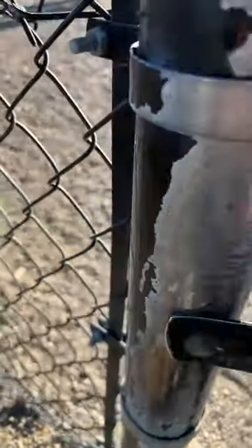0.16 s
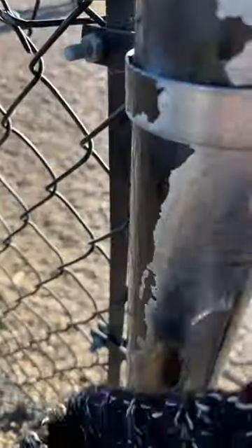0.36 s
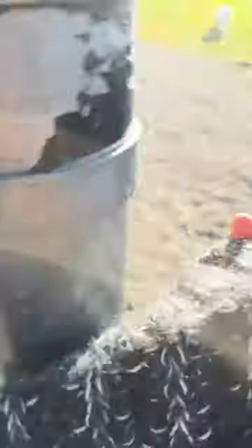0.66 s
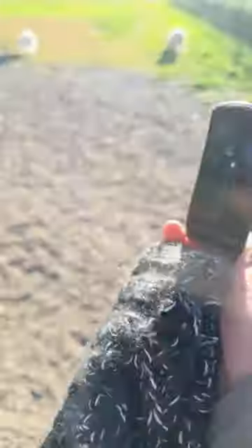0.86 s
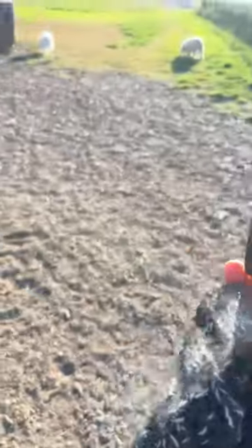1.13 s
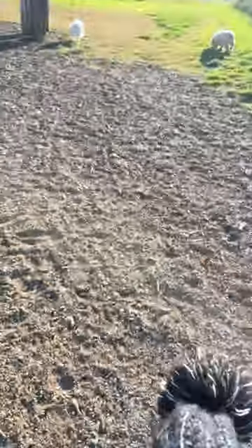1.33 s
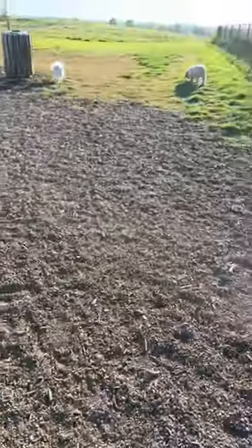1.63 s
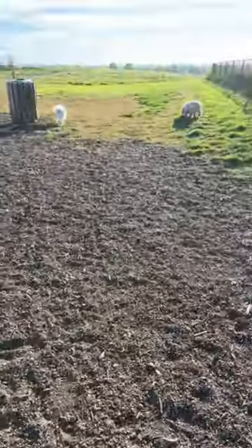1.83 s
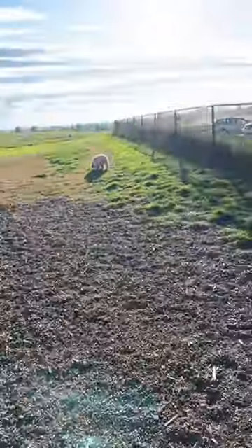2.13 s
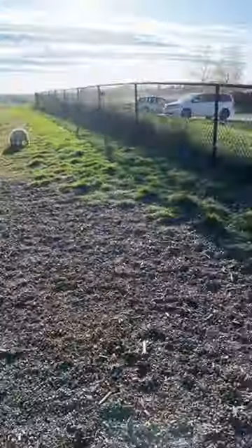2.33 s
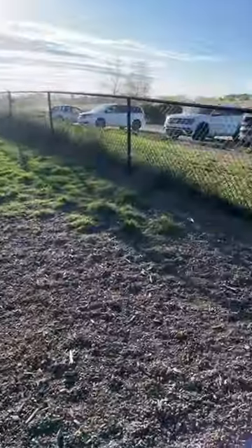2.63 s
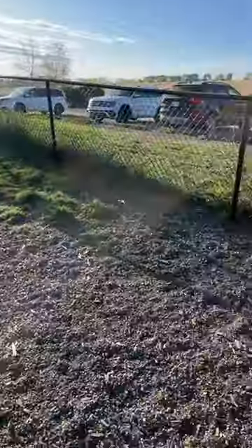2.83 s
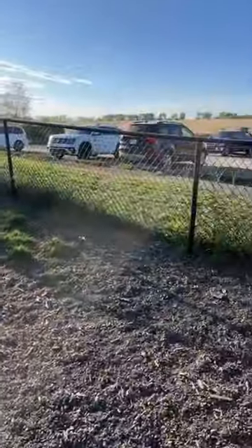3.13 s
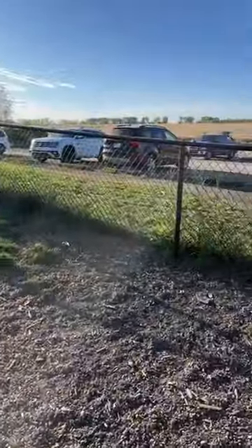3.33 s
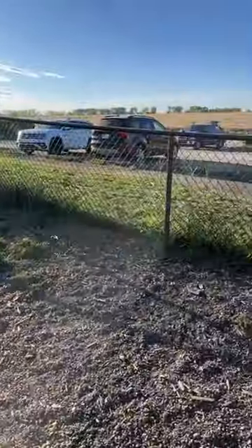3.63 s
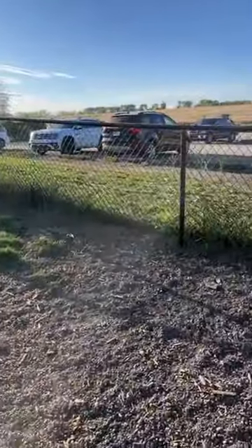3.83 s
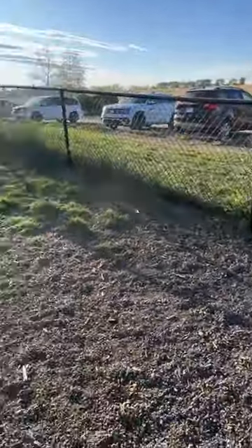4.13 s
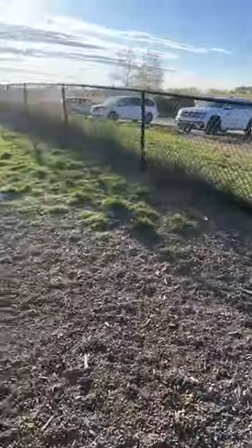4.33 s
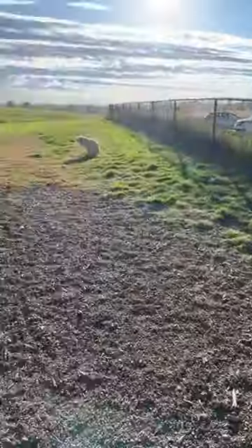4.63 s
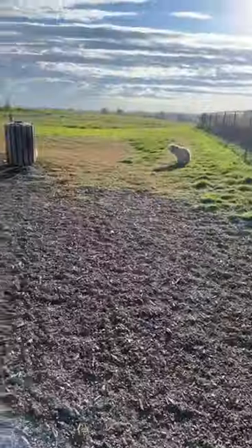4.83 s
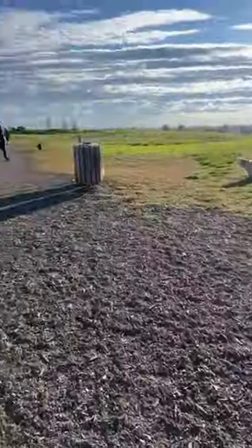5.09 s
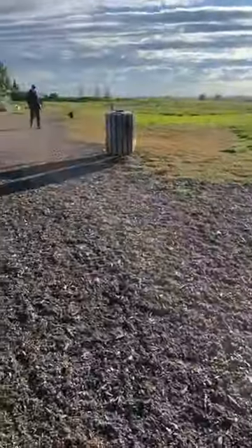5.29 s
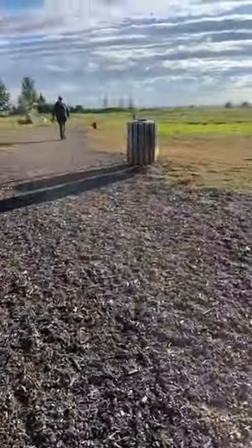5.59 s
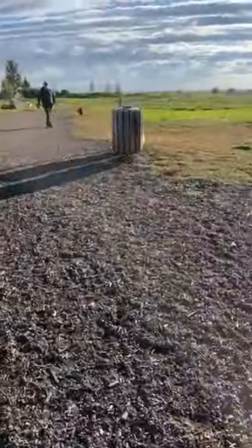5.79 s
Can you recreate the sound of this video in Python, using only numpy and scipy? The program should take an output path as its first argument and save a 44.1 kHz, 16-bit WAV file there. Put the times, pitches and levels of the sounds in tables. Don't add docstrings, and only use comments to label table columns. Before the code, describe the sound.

Close outdoor sound of a chain-link gate: fork latch clanks on its post, a bar scrapes and knocks, a brief dropout, then a ring chimes. Bright bar clacks follow, the hinge squeals, and the frame slams and rattles around four seconds, with a last latch clank. Afterwards only low far traffic, faint hiss, quick bird ticks and light mulch crunches remain.

```python
import sys
import numpy as np
from scipy import signal
from scipy.fft import rfft, irfft, next_fast_len
from scipy.io import wavfile
from scipy.ndimage import uniform_filter1d, map_coordinates

SR = 44100
rng = np.random.default_rng(int(sys.argv[2]) if len(sys.argv) > 2 else 0)


def invert_db(level):
    return 10 ** (np.asarray(level, dtype=float) / 20)


def put_to_file(sound):
    columns = np.atleast_2d(sound).T
    safe = np.clip(columns, -1, 1)
    whole_steps = np.round(safe * 32767)
    wavfile.write(sys.argv[1], SR, whole_steps.astype(np.int16))


N = 262452


def unit(x):
    return x / np.sqrt(np.mean(x ** 2) + 1e-20)


def along(points, hz):
    f, v = np.transpose(points)
    return np.interp(np.log(hz + 1), np.log(f + 1), v)


def curves(rows, t):
    s, *columns = np.transpose(rows)
    return [np.interp(t, s, column) for column in columns]


def span(rows):
    first = round(rows[0][0] * SR)
    last = min(N, round(rows[-1][0] * SR))
    return np.arange(first, last) / SR


def wobble(rate, size=N):
    knots = rng.standard_normal(size + 8)
    return map_coordinates(knots, [np.arange(size) * rate / SR])


def filtered(x, response):
    m = next_fast_len(len(x) + 8192)
    return irfft(rfft(x, m) * response(np.fft.rfftfreq(m, 1 / SR)), m)[:len(x)]


def patchy(x, patchy_db):
    z = signal.stft(x, nperseg=512)[2]
    field = uniform_filter1d(rng.standard_normal(z.shape), size=8, axis=0)
    field = uniform_filter1d(field, size=12, axis=1)
    return signal.istft(z * invert_db(patchy_db * unit(field)), nperseg=512)[1][:N]


def noise(spectrum, patchy_db):
    white = patchy(rng.standard_normal(N), patchy_db)
    return unit(filtered(white, lambda hz: invert_db(along(spectrum, hz))))


def add(track, s, x):
    part = track[round(s * SR):][:len(x)]
    part += x[:len(part)]


def tone(hz, db, t60, rise):
    t = np.arange(SR * 2 // 3) / SR
    return invert_db(db - 60 * t / t60) * (1 - np.exp(-t / rise)) * np.sin(2 * np.pi * hz * t)


def swell(s, db, build, lose):
    late = np.arange(N) / SR - s
    shape = np.abs(late / np.where(late < 0, build, lose)) ** 1.4
    return invert_db(db - 20 * shape)


def ringing(x, modes):
    def bank(f):
        total = 0
        for k, (centre, width, db) in enumerate(modes):
            damping = 1j * f * width
            total = total + (-1) ** k * invert_db(db) * damping / (centre * centre - f * f + damping)
        return total

    power = sum(invert_db(2 * db) * np.pi * width / SR for centre, width, db in modes)
    return filtered(x, bank) / np.sqrt(power)


SPLIT_HZ = 6000


def struck(hits, modes, rise, mesh):
    lead_s, lead_rises, lead_db = .009, 3, -22
    t = np.arange(SR // 5) / SR - lead_s
    after = np.maximum(t, 0)
    graze = np.maximum(1 + t / min(lead_s, lead_rises * rise), 0) * (t < rise)
    touch = np.maximum(1 - np.exp(-after / max(rise, .0003)), invert_db(lead_db) * graze)
    crack = 1 + 2.2 * invert_db(-60 * np.abs(t - rise) / 0.0092)
    rattle, drive = np.zeros((2, 2, N))
    for s, db, high_db, t60, ring_db in hits:
        blow = invert_db(db - 11.0 - 60 * after / max(t60, .004)) * touch
        start = s - .0015 - lead_s
        for band, gain in enumerate([1, invert_db(high_db)]):
            add(rattle[band], start, gain * blow * crack)
            add(drive[band], start, gain * invert_db(ring_db) * blow)
    force = drive * rng.standard_normal((2, N))
    low = [mode for mode in modes if mode[0] < SPLIT_HZ]
    high = [mode for mode in modes if mode[0] >= SPLIT_HZ]
    return np.sum(rattle * mesh, axis=0) + 2 * ringing(force[0], low) + 2 * ringing(force[1], high)


def grit_bursts(rows):
    out, t = np.zeros(N), np.arange(SR // 8) / SR
    for s, db, hz, t60 in rows:
        burst = invert_db(-60 * t / max(t60, .003)) * (1 - np.exp(-t / 0.001057)) * rng.standard_normal(len(t))
        grit = filtered(burst, lambda f: invert_db(-11 * np.log2((f + 1) / hz) ** 2) + .02)
        add(out, s - .001, invert_db(db - 3.0) * grit / np.abs(grit).max())
    return out


# frequency in Hz, density in dB per Hz.
ROAD = [(15, -73), (25, -48.5), (43, -28), (65, -4.5), (113, -0.5), (219, -3), (253, -6.5), (544, -9),
        (840, -6.5), (1500, -15), (2620, -38), (3220, -43.5), (3500, -61.5), (4550, -72), (7700, -120)]
# time in seconds, level in dB.
TRAFFIC = [(0.0, -46.5), (0.5, -41), (0.68, -45.5), (5.95, -45.5)]


def traffic():
    level_db = curves(TRAFFIC, np.arange(N) / SR)[0] - 1.17 + 0.49 * wobble(7.5)
    return invert_db(level_db) * noise(ROAD, patchy_db=1.35)


# frequency in Hz, density in dB per Hz.
HISS = [(1290, -17.5), (2200, -2), (2930, -10.5), (3060, -7), (3330, -4.5), (6210, -6.5), (13400, -11),
        (15200, -16.5), (16500, -38)]
# time in seconds, level in dB.
GRASS = [(0, -68.5), (1.15, -68), (1.7, -72.5), (4.4, -73), (4.6, -80.5), (5.5, -77.5), (5.95, -73.5)]
# time of the peak in seconds, level in dB, seconds to build 20 dB, seconds to lose 20 dB.
BRUSH = [(1.05, -63.5, .5, 0.15), (1.77, -69, 0.4, 0.7), (2.1, -65, 0.24, 0.1), (3.5, -79, 1.7, -1),
         (4.72, -71, 0.1, -0.24), (4.95, -72.5, 0.2, 0.3), (5.41, -73, 0.44, -0.1), (5.62, -67.5, 0.2, 0.3)]


def rustle():
    power = invert_db(2 * curves(GRASS, np.arange(N) / SR)[0])
    power = power + sum(swell(*row) ** 2 for row in BRUSH)
    return np.sqrt(power) * invert_db(.6 + 1.2 * wobble(16)) * noise(HISS, patchy_db=1.3)


# frequency in Hz, density in dB per Hz.
CLATTER = [(240, -49.5), (400, -16.5), (711, -14), (2020, -13), (3650, -4), (4000, -4.5), (6490, -1.5),
           (7010, -3.5), (10500, 2), (13500, -8), (15900, -8), (16600, -39.5)]


def loose_mesh():
    grit = noise(CLATTER, patchy_db=3) * invert_db(2.5 * wobble(700))
    low = filtered(grit, lambda f: 1 / (1 + (f / SPLIT_HZ) ** 4))
    return np.array([unit(low), unit(grit - low)])


# time in seconds, peak in dB, treble share in dB, T60 in seconds,
# share in the resonances in dB.
FORK_HITS = [(.1043, -31, -5, 0.034, 19), (.1118, -34.5, -9.5, 0.052, 15), (.184, -50.5, -15, 0.048, 12),
             (.2815, -28.5, -7, 0.052, 13.5), (.3184, -33, -9, 0.061, 2), (.342, -33.5, -13.5, 0.05566, 6),
             (3.5314, -54, -14.5, 0.02848, 2), (4.2605, -20, 1.5, 0.052, 8.5),
             (4.2985, -26.5, -7, 0.029, 10), (4.3364, -45, -16, 0.084, -1), (4.3794, -46, -18, 0.02396, -5)]
# frequency in Hz, width in Hz, level in dB.
FORK = [(1150, 110, -14), (4030, 70, -10), (4368, 45, 0.5), (4580, 40, -1.5), (4700, 80, -4.5),
        (5027, 170, -4.5), (6550, 73, -9.5), (7400, 72, -3), (8100, 43, -2.5), (8200, 210, -3),
        (9100, 340, -6.5), (11980, 83, -4.5), (12810, 30, -21), (13600, 70, -13), (15000, 360, -15)]


def fork(mesh):
    return struck(FORK_HITS, FORK, .0028, mesh)


# time in seconds, frequency in Hz.
CHIME_HZ = [(.112, 4344), (.445, 716), (.506, 3210), (.53, 3716), (.531, 14590), (1.05, 2600), (1.2, 8775),
            (1.201, 8812), (1.31, 14250), (2.402, 3720), (2.415, 9900), (2.941, 155), (2.997, 125),
            (3.115, 14590), (3.703, 2158), (3.955, 1600), (4.3, 8020), (4.262, 6546), (.392, 3200),
            (3.996, 3182), (4.01, 8247), (4.262, 4339), (2.415, 7440), (.445, 3705), (.104, 4900),
            (.28, 4930), (.104, 7450), (.276, 7450), (1.2, 3510), (.525, 10300)]
# peak in dB, T60 in seconds.
CHIMES = [(-44, 0.24), (-33.5, 0.18), (-43.5, 0.2), (-54.5, 0.264), (-44, .21), (-58, 0.18), (-28.5, 0.23),
          (-33, 0.23), (-54, .18), (-45, 0.1), (-44, .15), (-24, 0.038), (-35, 0.093), (-48, 0.1772),
          (-39.5, 0.18), (-39, .081), (-49, 0.3413), (-24.5, 0.098), (-34, 0.29), (-37.5, 0.39),
          (-30.5, 0.27), (-22.5, 0.12), (-48, .12), (-31, .2), (-33, .07), (-35, .06), (-38, .08),
          (-37, .08), (-40, 0.16), (-45, .12)]


def chimes():
    out = np.zeros(N)
    for (s, hz), (db, t60) in zip(CHIME_HZ, CHIMES):
        add(out, s, tone(hz, db, t60, rise=.0035))
    return out


# time in seconds, peak in dB, treble share in dB, T60 in seconds,
# share in the resonances in dB.
BAR_RUBS = [(.368, -29.5, -11, 0.088, 1), (.4005, -24, -7.5, .12, -6), (.435, -26, -6.5, 0.11, 1),
            (.452, -28.5, -4, 0.092, 2.5), (.461, -23.5, -2.5, 0.067, 2.5), (.473, -26, 0, 0.039, 0),
            (.481, -38, -5, 0.026, -14)]
# time in seconds, peak in dB, treble share in dB, T60 in seconds,
# share in the resonances in dB.
BAR_HITS = [(.4035, -27, -10, .02, -10), (.4384, -25, -8, .02, -10), (.373, -36, 0, 0.018, -10),
            (4.1565, -29, 5, 0.028, -14), (4.167, -42, 3.5, .03, -13), (.5068, -15.5, -9, 0.057, -1.5),
            (.5268, -22.5, 1.5, 0.064, -11.5), (2.3994, -44, 7.5, 0.06274, -5), (2.4147, -46, 7.5, 0.09, 5),
            (2.4948, -43.5, 10.5, 0.03246, -8), (2.5319, -16, 0, 0.04538, 1.9),
            (2.5425, -12, 7.5, 0.05953, -8), (2.5544, -21.5, -5, 0.0609, -10),
            (2.5684, -18.5, -1, 0.075, -7.5), (2.5974, -29.5, -2, 0.065, -4), (2.6078, -40, -7, .05, -10.5),
            (3.1055, -38.5, -5, 0.0719, -8.5), (3.1151, -31.5, -1.5, 0.074, -8),
            (3.176, -41, 2.5, .038, -11), (3.2218, -43.5, 3, 0.05106, -11.5)]
# frequency in Hz, width in Hz, level in dB.
BAR = [(692, 36, -12), (815, 35, -10), (1104, 64, -7.5), (1646, 100, -10.5), (2150, 64, -13),
       (3236, 47, -4), (3740, 40, 3.5), (5425.8, 90, -7), (6310, 40, 0), (7500, 45, -5), (8730, 81, -6.5),
       (9877.2, 68, -6.5), (10610, 50, -3.5), (11910, 60, -11.5), (12640, 65, -11), (13200, 160, -10.5),
       (13600, 50, -5.5), (15187, 110, -10.5)]


def bar(mesh):
    blows = struck(BAR_HITS, BAR, 0.0011, mesh)
    rubs = struck(BAR_RUBS, BAR, .005, mesh)
    return blows + rubs


# frequency in Hz, density in dB per Hz.
RASP = [(1060, -42), (1800, -9), (2120, -6), (2550, -8.5), (3140, -5), (8280, -13), (15500, -23.5),
        (16600, -45)]
# time of most pressure in seconds, level in dB, seconds to build 20 dB,
# seconds to lose 20 dB, share in the resonances in dB.
SCRAPE = [(.47, -36.5, 0.17, 0.0547, 4.5), (1.305, -44, 0.03, .06, -13), (2.402, -55, 0.01, 0.11, 6),
          (2.53, -56, 0.02, 0.16, 3), (2.565, -32.5, -0.0857, 0.0766, -8), (3.14, -54.5, 0, -0.03, 0),
          (3.42, -67, 0.5, -1.5, -1), (3.64, -50.5, 0.18, 0.03, -7), (3.77, -54.5, 0, 0.47, -10),
          (3.985, -42.5, 0.28, 0.07, -3.5), (4.035, -39.5, 0.0247, 0.2371, -5.5), (4.2, -54, 0.26, .1, -15),
          (3.25, -56.5, 0.06, 0.22, -18), (4.33, -45.5, 0.15, 0.13, -15.5)]


def scrape():
    grains = patchy(rng.standard_normal(N), patchy_db=4) * invert_db(3 * wobble(300))
    steel = unit(ringing(grains, BAR + FORK[1:6]))
    mesh = unit(noise(RASP, patchy_db=1.8) * invert_db(2.2 * wobble(70)))
    out = np.zeros(N)
    for s, db, build, lose, tuned_db in SCRAPE:
        out += swell(s, db - 8, build, lose) * (mesh + invert_db(min(tuned_db, 8)) * steel)
    return out


# time in seconds, peak in dB, centre in Hz, T60 in seconds.
TICKS = [(0.8982, -42, 5223, 0.078), (1.094, -39, 3080, 0.1034), (1.144, -47, 3120, .013),
         (1.7851, -50, 5360, 0.063), (1.963, -54, 3430, 0.0368), (1.989, -46, 3350, 0.041),
         (3.4274, -46, 4933, 0.021), (4.884, -52, 4720, .03), (5.496, -52.5, 2600, 0.012),
         (5.5915, -46, 2500, 0.015), (5.6033, -47, 2800, 0.011), (5.6284, -48, 5200, .016),
         (5.6554, -48, 3050, .014), (5.6833, -46, 2700, .014), (5.7372, -52, 2400, .012),
         (5.7616, -47, 3300, .014), (2.18, -48.5, 4000, 0.014), (4.2994, -21.5, 4730, .02),
         (3.2, -54, 5000, .03), (3.26, -53.5, 5500, .03), (3.29, -52, 5500, .03), (3.318, -52, 5500, .03),
         (3.34, -49, 5000, .03), (3.354, -49, 5000, .03), (2.452, -50, 6000, .04), (2.51, -54, 3300, .04),
         (2.12, -48, 9000, .03), (1.175, -35, 2300, .012), (1.7476, -44.5, 5600, .05)]


def ticks():
    return grit_bursts(TICKS)


# time in seconds, peak in dB, treble share in dB, T60 in seconds,
# share in the resonances in dB.
RING_HITS = [
    (1.0515, -52, 1.5, 0.1, -6),
    (1.1971, -27, 3.5, 0.068, 6),
    (1.206, -29, -8, 0.15, -13),
    (1.301, -27, -4.5, 0.12, -15),
    (3.456, -28, -7, 0.051, -21),
    (3.554, -42, -1, 0.049, 1.5),
]
# frequency in Hz, width in Hz, level in dB.
RING = [(1720, 399.3, -8.5), (2470, 200, -9.5), (3120, 45, 3.5), (3550, 33, 1.5), (4020, 81, -3),
        (5036.6, 39.54, -12), (7140, 40, -22), (8900, 30, 4.5), (9430, 60, 6), (10000, 50, -15),
        (12950, 770, -27)]


def ring_blows(mesh):
    return struck(RING_HITS, RING, 0.003426, mesh)


def strokes_of(strokes, tones):
    out = np.zeros(N)
    for s, db in strokes:
        add(out, s, sum(tone(hz, db + level_db, t60, rise=0.0066) for hz, level_db, t60 in tones))
    return out


# frequency in Hz, level in dB, T60 in seconds.
RING_TONES = [(3110, -0.5, 0.72), (3140, -2, 0.69)]
# time in seconds, level in dB.
RING_STROKES = [
    (1.118, -60),
    (1.213, -31.5),
    (1.309, -46),
]


def ring_chime():
    return strokes_of(RING_STROKES, RING_TONES)


# frequency in Hz, level in dB, T60 in seconds.
TAG_TONES = [(11100, 0, .05), (9500, -4, .045)]
# time in seconds, level in dB.
TAG_STROKES = [
    (1.783, -55.5),
    (2.04, -72),
    (2.178, -64),
    (2.282, -52),
    (2.297, -64),
]


def tags():
    return strokes_of(TAG_STROKES, TAG_TONES)


# start in seconds, length in seconds, peak in dB, centre
# in Hz.
STEPS = [
    (1.969, .11, -52.5, 3460),
    (4.6, .18, -68.5, 2400),
    (5.558, .15, -53.5, 3300),
    (5.7, .12, -66, 3000),
]


def steps(count=20):
    scatter_db, scatter_octaves, t60 = 3.5, .4, .016
    rows = []
    for s, length, db, hz in STEPS:
        when = s + length * (np.arange(count) + rng.random(count)) / count
        size, pitch = rng.standard_normal((2, count))
        rows += zip(when, db + scatter_db * size, hz * 2 ** (scatter_octaves * pitch), [t60] * count)
    return grit_bursts(rows)


# time in seconds, frequency in Hz, level in dB.
SLIDE = [(2.398, 1500, -44), (2.41, 1330, -46), (2.425, 1150, -38), (2.445, 1090, -43), (2.465, 1060, -61)]


def slide():
    out, t = np.zeros(N), span(SLIDE)
    hz, db = curves(SLIDE, t)
    add(out, t[0], invert_db(db) * np.sin(2 * np.pi * np.cumsum(hz) / SR))
    return out


# start in seconds, length in seconds, first frequency in Hz, last frequency in Hz, level in dB.
WHINE = [
    (2.55, .85, 1279, 1562, -56.5),
    (4.65, .4, 1600, 1353, -63),
]
BEND = [.7, 1.05]


def whine():
    out = np.zeros(N)
    for (s, length, first_hz, last_hz, db), bend in zip(WHINE, BEND):
        u = np.linspace(0, 1, round(length * SR))
        hz = first_hz + (last_hz - first_hz) * np.sin(np.pi / 2 * u) ** bend
        level_db = db + 3.5 - 12 * u + 2.5 * wobble(19, size=len(u))
        add(out, s, invert_db(level_db) * np.sin(2 * np.pi * np.cumsum(hz) / SR))
    return out


# time in seconds, slip rate in Hz, level in dB.
SQUEALS = [
    [(2.598, 3048, -57), (2.63, 2790, -50), (2.68, 2850, -51.5), (2.705, 2760, -49), (2.735, 2757, -45.5),
     (2.8, 2743, -55), (2.89, 2724, -68.5)],
    [(2.882, 2270, -65), (2.89, 2276, -54), (2.912, 2230, -66), (2.925, 2150, -56), (2.965, 2128, -56),
     (2.98, 2140, -73)],
    [(3.025, 2110, -67), (3.04, 2180, -59.5), (3.065, 2115, -56.5), (3.09, 2190, -61)],
    [(3.09, 2180, -59), (3.3, 2167, -66), (3.365, 2163, -63)],
    [(3.53, 2120, -68), (3.66, 2136, -59.5), (3.715, 2140, -52), (3.732, 2180, -54.5), (3.748, 2303, -53.5),
     (3.81, 2336, -54.5), (3.9, 2360, -55)],
    [(3.9, 2150, -63), (3.93, 2117, -61), (4.16, 2170, -60), (4.19, 2180, -56.5), (4.25, 2180, -63)],
]
OVERTONES = [(3, -3.5, -4.5, -14.5, -12.5, -40), (-16, 0.5, -7.5, -18.5, -28, -31),
             (-10, -1, -7, -16, -28, -35), (-20, -2.5, -14, -10, -30, -35), (-4, 1.5, -6.5, -13, -18, -21),
             (1.8, -5, -19, -10.5, -32, -14)]
# seconds until every second slip weakens, level in dB of the lines halfway,
# steady jitter as a share of the rate, seconds of rough start.
GRIP = [(.01, -38, .0015, 0.11), (.01, -41, .004, 0.002817), (.01, -7, .012, .003), (.01, -25, .03, .003),
        (.218, -3, 0.0065, 0.164), (.01, -15, .02, .003)]


def hinge():
    dulling = .12
    out = np.zeros(N)
    for rows, overtones, (split, half_db, steady, catch) in zip(SQUEALS, OVERTONES, GRIP):
        t = span(rows)
        since = t - t[0]
        hz, db = curves(rows, t)
        db = db - 30 * np.exp((t - t[-1]) / .004)
        half = invert_db(half_db) * np.minimum(since / split, 1) ** 60
        jitter = steady + .014 * np.exp(-(since / catch) ** 4)
        turn = 2 * np.pi * np.cumsum(hz * (1 + jitter * wobble(800, size=len(t)))) / SR
        for k, level_db in enumerate(overtones):
            flutter_db = (2 + .7 * k) * wobble(50, size=len(t)) + 1.6 * wobble(300, size=len(t))
            gain = invert_db(db + dulling * k * (db - db.max()) + level_db + flutter_db)
            lines = np.sin((k + 1) * turn) + half * np.sin((k + 3 / 2) * turn)
            add(out, t[0], gain * lines * np.sqrt(2))
    return out


# time in seconds, peak in dB, treble share in dB, T60 in seconds,
# share in the resonances in dB.
FRAME_HITS = [
    (3.9933, -8, 0.5, 0.028, 2),
    (4.0094, -19, -2, 0.04, 2),
    (4.0234, -19, -3.5, 0.05, 0.5),
    (4.0414, -28.5, -1, .07, 3.5),
    (4.056, -31, -5.5, .07, 0.5),
    (4.092, -39.5, -10, .05, -3),
]
# frequency in Hz, width in Hz, level in dB.
FRAME = [(599, 30, -17), (1075, 31, -13.5), (1586, 38, -9), (2588.2, 13, -15.5), (3217, 54, -0.5),
         (3720, 30, -10), (4194, 34, 2), (4511, 29, -5.5), (5000, 96, -2), (6170, 38, -8.5), (7553, 40, -9),
         (8047.3, 45, -4), (8250, 18, -0.5), (8000, 45, -4.5), (9900, 61, -10.5), (10410, 30, -14),
         (11900, 49, -24), (14500, 60, -8), (15100, 146, -14)]


def frame(mesh):
    return struck(FRAME_HITS, FRAME, 0.0025, mesh)


def bird():
    out = np.zeros(N)
    for k, (pitch, size) in enumerate(rng.standard_normal((5, 2))):
        tick = tone(4150 * (1 + .008 * pitch), -53 + 1.238 * size, t60=0.029, rise=0.0026)
        add(out, 4.525 + k * .0505, tick)
    return out


def scene():
    mesh = loose_mesh()
    surroundings = traffic() + rustle() + whine() + bird()
    gate = fork(mesh) + bar(mesh) + ring_blows(mesh) + frame(mesh)
    friction = scrape() + slide() + hinge()
    small = chimes() + ticks() + ring_chime() + tags() + steps()
    return (surroundings + gate + friction + small)[None]


def low_pass(x):
    return signal.sosfilt(signal.butter(12, 16820, fs=SR, output="sos"), x)


# time in seconds, gain in dB.
FADE = [
    (.815, 0),
    (.884, -46),
    (.885, -8),
    (.899, 0),
]


def record(dry):
    gain = invert_db(curves(FADE, np.arange(N) / SR)[0])
    return low_pass(dry * gain)


dry = scene()
out = record(dry)
put_to_file(out)
```